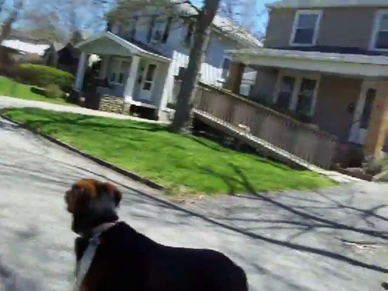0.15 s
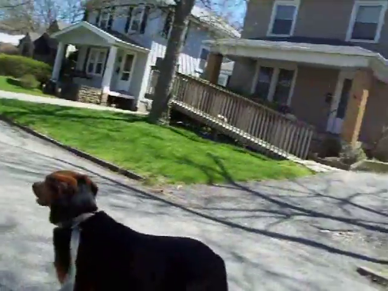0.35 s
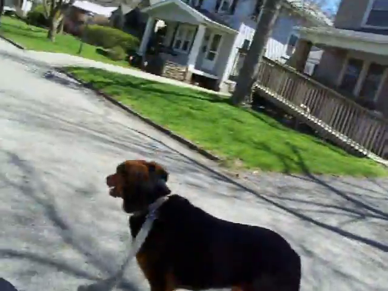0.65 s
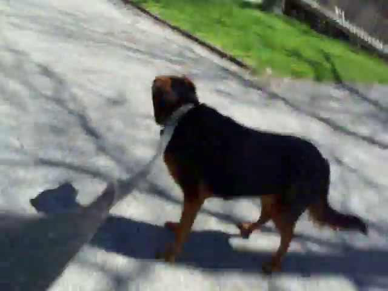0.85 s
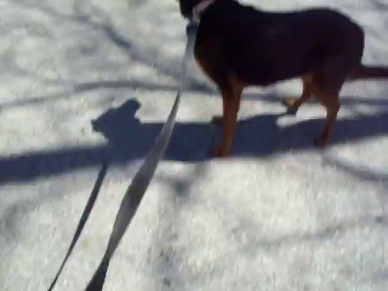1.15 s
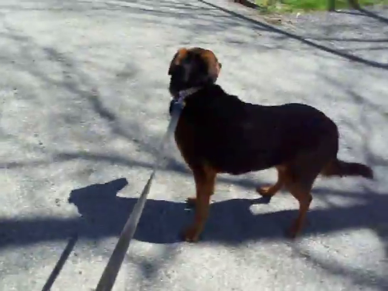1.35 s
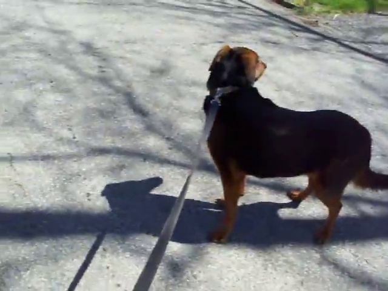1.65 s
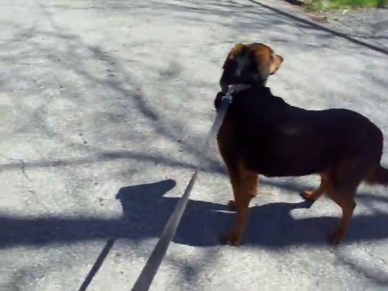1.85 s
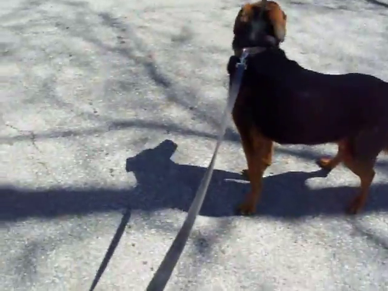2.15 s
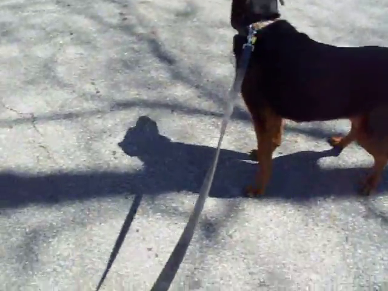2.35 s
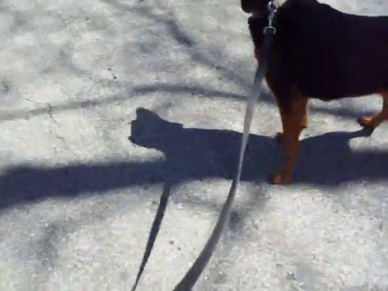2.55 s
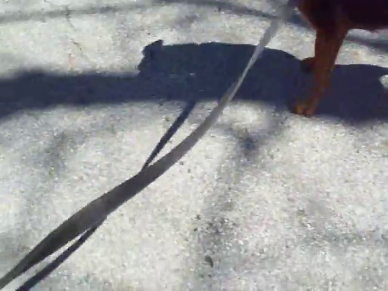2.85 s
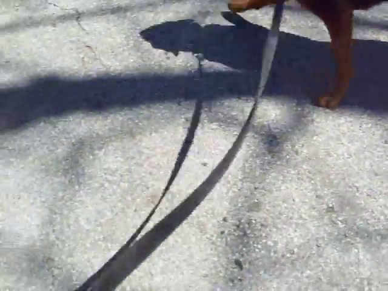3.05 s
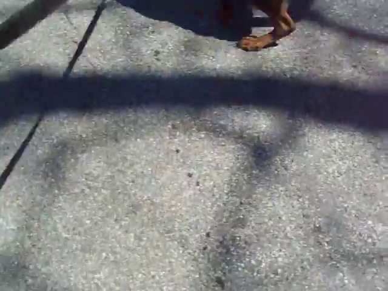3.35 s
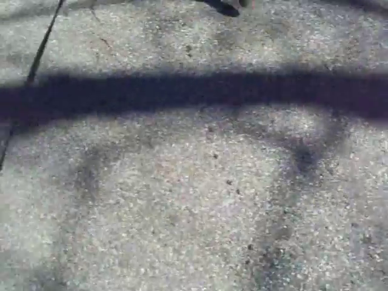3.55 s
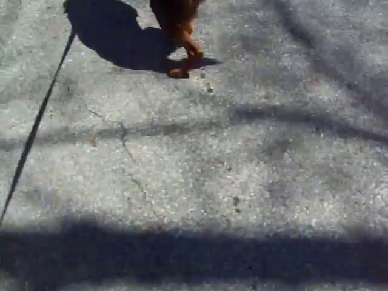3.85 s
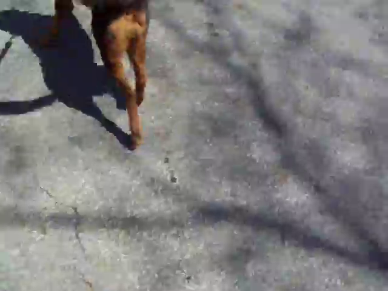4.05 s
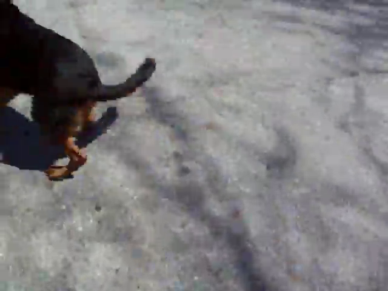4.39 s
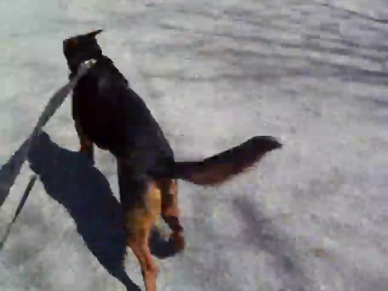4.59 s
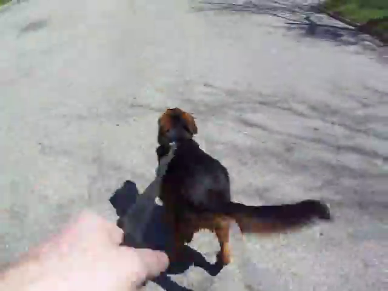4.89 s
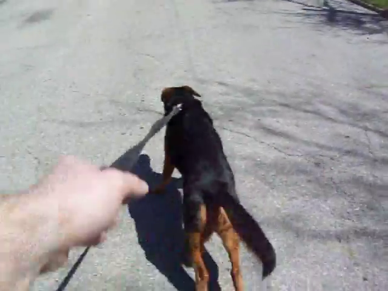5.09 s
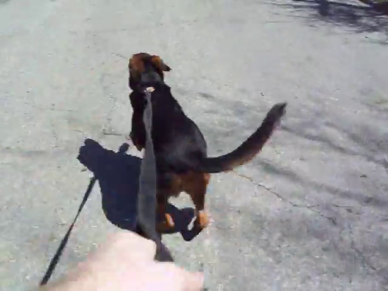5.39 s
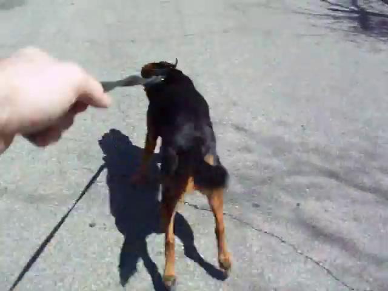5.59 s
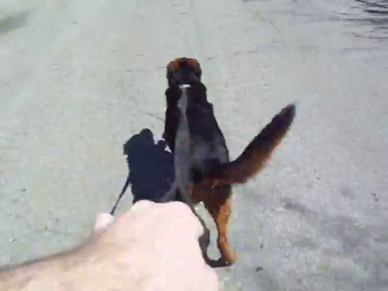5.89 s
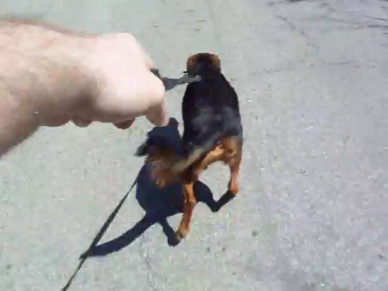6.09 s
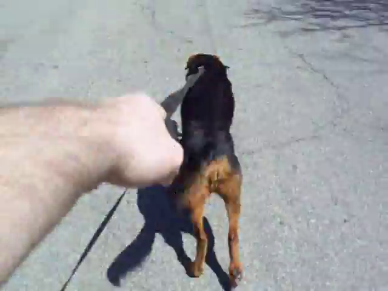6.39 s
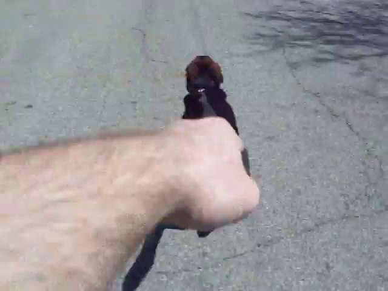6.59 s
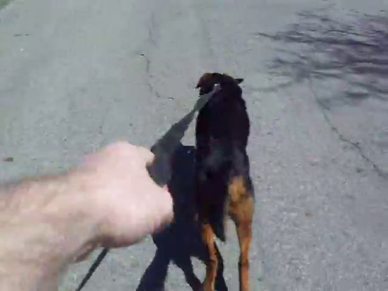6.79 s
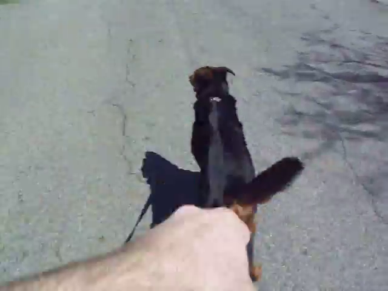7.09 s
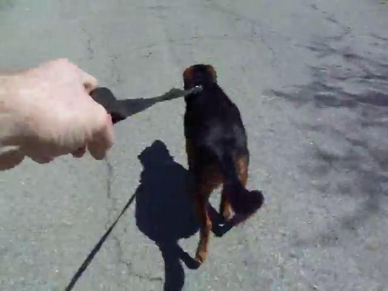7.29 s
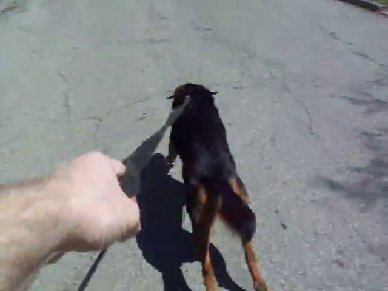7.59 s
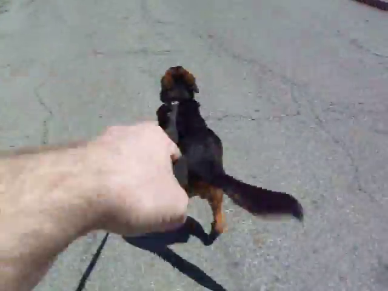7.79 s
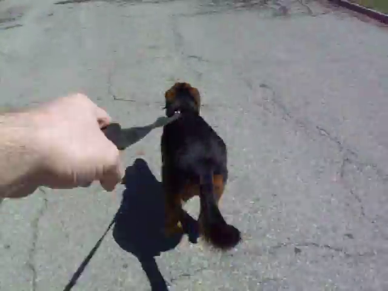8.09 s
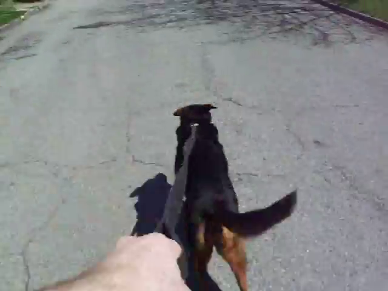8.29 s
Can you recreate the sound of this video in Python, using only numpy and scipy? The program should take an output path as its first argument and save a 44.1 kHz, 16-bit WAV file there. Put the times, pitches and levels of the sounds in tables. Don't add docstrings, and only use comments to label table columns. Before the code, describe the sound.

Quiet outdoor hum and repeated bird whistles, two hard wooden clacks, then skateboard wheels build from faint rattle to rough, buffeted roar.

```python
import sys
import numpy as np
from scipy import signal
from scipy.fft import rfft, irfft
from scipy.io import wavfile
from scipy.ndimage import uniform_filter1d

SR = 44100
rng = np.random.default_rng(int(sys.argv[2]) if len(sys.argv) > 2 else 0)


def digitize_waveform(pressure):
    field = np.atleast_2d(pressure).T
    bounded = np.clip(field, -1, 1)
    quanta = np.round(bounded * 32767).astype(np.int16)
    wavfile.write(sys.argv[1], SR, quanta)


def to_linear_factor(level_db):
    exponent = np.asarray(level_db, float) / 20
    return 10 ** exponent


N = 372204
T = np.arange(N) / SR

# t/s, blow/dB, contact/s, crack/dB, shudder/dB, shudder t60/s
SLAPS = [
    (3.0054, 3, .0003, -4, -13, .16),
    (3.1655, -3, .0015, -40, -16, .1),
]
# t/s, peak/dB, centre f/Hz, truck knock/dB
GRIT_TICKS = [(3.4693, -42.5, 2400, -36.5), (3.5982, -44.5, 2960, -65), (3.6369, -47, 2620, -43),
              (3.6691, -45, 2600, -45), (3.7217, -36.5, 2550, -35), (3.746, -51, 2930, -30),
              (3.7723, -37, 2640, -32.5), (3.8812, -38, 2710, -31.5), (3.9737, -48, 2700, -32),
              (4.002, -54, 2600, -35), (4.0257, -52.5, 2850, -43), (4.0712, -41, 2650, -37),
              (4.2251, -36, 2610, -26), (4.2586, -46, 2670, -38), (4.349, -46, 2660, -27),
              (4.372, -49, 2660, -45), (4.3977, -51, 2640, -47), (4.5266, -43.5, 2870, -31),
              (4.5681, -38.5, 3940, -42), (4.8122, -44.5, 2980, -42), (4.8668, -37.5, 2930, -55),
              (5.1375, -35.5, 6530, -51), (5.2056, -55.5, 3400, -29), (5.2452, -35, 7460, -34),
              (5.271, -36.5, 2770, -30.5), (5.3188, -33.5, 4220, -36.5), (5.5293, -40, 2620, -35),
              (5.583, -30, 4660, -43.5), (5.6843, -36.5, 3090, -35.5), (5.7211, -37, 2990, -28.5),
              (5.7754, -28.5, 3270, -34), (5.8365, -37, 2650, -28.5), (5.9963, -34, 2670, -33),
              (6.1113, -38, 2970, -23), (6.1634, -30, 2950, -29.5), (6.2395, -42, 2910, -18),
              (6.2973, -33, 2730, -22), (6.4021, -31, 2610, -31.5), (6.6036, -36, 2710, -29),
              (6.7854, -35, 3240, -29.5), (6.8262, -34.5, 2590, -30.5), (6.8541, -30, 2444, -20),
              (6.9057, -38, 2950, -30.5), (6.9966, -32.5, 2850, -15), (7.0583, -36.5, 2980, -22),
              (7.1136, -33.5, 2720, -28), (7.1567, -38, 2590, -28.5), (7.1828, -34.5, 2760, -40),
              (7.275, -42, 4510, -36.5), (7.306, -31, 2770, -22), (7.3753, -34.5, 2750, -25.5),
              (7.4214, -29, 2570, -18.5), (7.6154, -32, 2840, -30.5), (7.6425, -39.5, 2750, -25),
              (7.7075, -31, 2640, -29), (7.844, -36, 2860, -30.5), (7.869, -37.5, 2620, -32),
              (7.9851, -34, 2620, -31.5), (8.1379, -43, 2970, -19), (8.1699, -36, 2550, -30),
              (8.2268, -29, 2620, -22), (8.3786, -29.5, 2550, -30)]


def columns(table):
    s, *values = np.transpose(table)
    return [np.interp(T, s, v, left=-120, right=-120) for v in values]


def white():
    return rng.standard_normal(N)


def unit(x):
    return x / np.sqrt(np.mean(x ** 2))


def colour(x, points):
    hz, db = np.transpose(points)
    f = np.maximum(np.fft.rfftfreq(N, 1 / SR), 1)
    gain = to_linear_factor(np.interp(np.log(f), np.log(hz), db))
    return unit(irfft(rfft(x) * gain, N))


def ring(x, hz, width):
    return signal.lfilter(*signal.iirpeak(hz, hz / width, SR), x)


def body(x, modes):
    out = 0
    for k, (hz, width, db) in enumerate(modes):
        out = out + (-1) ** k * to_linear_factor(db) * ring(x, hz, width)
    return unit(out)


def dull(x, hz):
    return signal.sosfilt(signal.butter(3, hz, fs=SR, output="sos"), x)


def walk(rate):
    hold = int(SR / rate)
    steps = np.repeat(rng.standard_normal(N // hold + 1), hold)
    return 1.2 * uniform_filter1d(steps, hold)[:N]


def stones(rate, spread_db):
    chance = rng.random((3, N))
    hit = chance[0] < rate / SR
    sign = np.sign(chance[1] - .5)
    return hit * sign * to_linear_factor(-spread_db * np.log(chance[2] + .01))


def add(out, s, piece):
    i = int(round(s * SR))
    piece = piece[max(-i, 0):N - i]
    out[max(i, 0):max(i, 0) + len(piece)] += piece


def struck(modes, length):
    t = T[:int(length * SR)]
    return sum(to_linear_factor(db - 60 * t / t60) * np.sin(2 * np.pi * hz * t) for hz, db, t60 in modes)


def clicks(table, sharpness):
    out, t = np.zeros(N), T[:SR // 20]
    for s, db, hz, t60 in table:
        fade = to_linear_factor(-60 * t / max(t60, .003)) * (1 - np.exp(-t / .0005))
        snap = rng.standard_normal(len(t)) * fade
        snap = ring(ring(snap, hz, hz / sharpness), 1.1 * hz, 1.6 * hz)
        add(out, s, snap / np.abs(snap).max() * to_linear_factor(db))
    return out


def bumps(table):
    out = np.zeros(N)
    for s, db, width in table:
        u = T[:SR // 20] / width - 2
        dip = np.exp(-u ** 2 * 2)
        swing_back = .5 * np.exp(-(u - 1.6) ** 2 / 4.1)
        add(out, s - 2 * width, to_linear_factor(db) * (swing_back - dip))
    return out


def street():
    # t/s, low air/dB, murmur/dB, motor/dB, motor overtone/dB
    levels = [(0.0, -44, -51.5, -65, -56), (0.18, -43, -53.5, -45, -58), (0.32, -43.5, -54.5, -46, -65),
              (0.58, -45, -48, -43.5, -57), (0.92, -47, -38, -37, -50), (1.05, -42, -45, -39.5, -54),
              (1.38, -46, -42, -39.5, -50), (1.71, -42.5, -46, -37.5, -46.5),
              (1.86, -50.5, -43.5, -38, -49.5), (2.12, -50.5, -43.5, -36.5, -46.5),
              (2.5, -44, -42, -40.5, -42), (2.84, -44.5, -42.5, -43.5, -45), (2.97, -54, -39, -47, -48),
              (3.07, -63, -43.5, -79.5, -55.5), (3.2, -56, -60, -74, -80), (3.34, -67, -75, -79, -80),
              (3.5, -66, -73, -78.5, -88.5)]
    # f/Hz, level/dB
    murmur = [(88, -20.5), (150, -1), (398, -8), (835, -8), (1640, -14.5), (3430, -20), (4570, -40.5),
              (7070, -35), (8370, -49), (10900, -76), (18400, -120)]
    # f/Hz, width/Hz
    motor = [(86, 8), (129, 7.3)]
    # f/Hz, width/Hz, level/dB
    whine = (4290, 25, -68)
    air_db, murmur_db, *motor_db = columns(levels)
    out = unit(ring(white(), 45, 38)) * to_linear_factor(air_db + 2.5 + .5 * walk(7.4))
    for (hz, width), db in zip(motor, motor_db):
        hum = ring(ring(white(), hz, width), hz, 3 * width)
        out += unit(hum) * to_linear_factor(db + 3)
    out += colour(white(), murmur) * to_linear_factor(murmur_db + 1.5 + 2.2 * walk(21))
    whine_hz, whine_width, whine_db = whine
    fade_in = np.clip(T / .73, 0, 1) ** 2
    until_slap = T < SLAPS[0][0]
    return out + unit(ring(white(), whine_hz, whine_width)) * to_linear_factor(whine_db) * until_slap * fade_in


def sung(curve):
    s, hz, db = np.transpose(curve)
    t = np.arange(s[0], s[-1], 1 / SR)
    hoarse = uniform_filter1d(rng.standard_normal((2, SR // 4)), size=150)[:, :len(t)] * 12
    pitch = np.interp(t, s, hz) * (1 + .03 * hoarse[1])
    return to_linear_factor(np.interp(t, s, db) + 3 * hoarse[0]) * np.sin(2 * np.pi * np.cumsum(pitch) / SR)


def birds():
    # t/s, f/Hz, level/dB
    whistle = [(-.09, 1720, -32), (-.075, 1750, -15), (-.048, 1900, -9), (-.034, 2250, -11),
               (-.026, 2900, -11), (-.018, 3250, -4), (-.004, 3700, -2), (.004, 3950, -20)]
    # t/s, level/dB
    whistle_ends = [(-.005, -36), (.19, -34), (.385, -33), (.577, -32), (.768, -29), (.958, -30),
                    (1.145, -33), (1.332, -32), (1.516, -32), (1.702, -32), (1.888, -32), (2.072, -35)]
    # t/s, f/Hz, level/dB
    chirps = [
        [(.475, 4430, -71), (.49, 5160, -51), (.497, 5500, -68)],
        [(.492, 4100, -68), (.503, 5200, -53), (.51, 4670, -47), (.54, 4040, -49), (.58, 3500, -60.5),
         (.62, 2940, -48), (.64, 2700, -66)],
        [(.485, 1734, -66), (.51, 1485, -47), (.55, 1750, -56), (.57, 1900, -59)],
    ]
    # delay/s, level/dB
    houses = [(.034, -6), (.013, -8), (.022, -12), (.08, -16), (.125, -22)]
    calls = np.zeros(N + SR)
    for s, db in whistle_ends:
        add(calls, 1 + s + whistle[0][0], sung(whistle) * to_linear_factor(db))
    for chirp in chirps:
        add(calls, 1 + chirp[0][0], sung(chirp))
    t = T[:SR // 3]
    echo = rng.standard_normal(len(t)) * to_linear_factor(-36 - 60 * t / .3)
    echo[0] = 1
    for delay, db in houses:
        add(echo, delay, rng.standard_normal(300) * to_linear_factor(db - 24))
    return signal.fftconvolve(calls, echo)[SR:SR + N]


def wind():
    # t/s, level/dB
    rumble = [(3.44, -66.5), (3.7, -66), (3.82, -56), (4.34, -58.5), (4.55, -37.5), (4.61, -52),
              (4.83, -40), (5.26, -33.5), (5.35, -25), (5.4, -31), (5.85, -24.5), (6.1, -30.5), (6.27, -16),
              (6.31, -23.5), (6.68, -19), (6.89, -25.5), (7.1, -21), (7.16, -26.5), (7.66, -26),
              (7.71, -21.5), (7.94, -24.5), (8.24, -17.5), (8.44, -23.5)]
    # t/s, peak/dB, width of the push/s
    gusts = [(6.27, -21, 0.002), (6.497, -11, 0.002), (6.643, -10.5, 0.0011), (6.701, -17, 0.0018),
             (7.057, -4.5, 0.002), (7.098, -7.5, 0.0022), (7.354, -19, 0.002), (7.454, -8, 0.0012),
             (7.718, -10, 0.0022), (8.288, -9, 0.0014)]
    buffeting = body(white(), [(40.4, 52.6, 0), (91.8, 56.3, .97)])
    return buffeting * to_linear_factor(columns(rumble)[0] + 2 * walk(12)) + bumps(gusts)


def hands():
    # t/s, level/dB
    cloth = [(0.0, -65), (0.18, -66), (0.2, -57), (0.45, -72), (0.5, -61), (0.59, -61), (0.71, -68.5),
             (0.73, -32), (0.75, -56), (0.78, -45.5), (0.8, -55.5), (0.95, -42), (0.96, -25), (0.97, -37),
             (1.05, -55), (1.23, -59.5), (1.34, -50), (1.49, -62), (2.15, -62.5), (2.54, -52.5),
             (2.55, -59), (2.62, -42), (2.65, -49.5), (2.69, -41.5), (2.7, -50), (2.79, -65.5), (2.81, -43),
             (2.83, -57), (3.0, -51.5)]
    # f/Hz, level/dB
    rustle = [(350, -36), (600, -13), (2090, -2), (2350, 2.5), (2750, -7), (3580, 2), (7090, -3.5),
              (8370, -19), (10900, -58.5), (18400, -120)]
    # t/s, peak/dB, centre f/Hz, t60/s
    shell_knocks = [(.7268, -11, 1300, .02), (.7275, -16, 4000, .012), (.7435, -21, 3000, .012),
                    (.767, -21, 1500, .03), (.7795, -21, 1300, .03), (.9588, -8, 2600, .012),
                    (.9875, -14, 1900, .012),
                    (0.8356, -26.5, 2730, 0.0092), (1.25, -29, 1810, 0.03), (1.589, -37, 3560, 0.015),
               (1.6581, -31, 2080, 0.011), (2.423, -32.5, 1880, 0.019), (2.4568, -25, 1530, 0.018),
               (2.6002, -23, 1380, 0.019), (2.6823, -20, 3630, 0.0071), (2.7444, -29, 1370, 0.017),
               (2.8085, -25, 1334, 0.019), (2.9605, -20, 1430, 0.011), (3.1076, -30.5, 1640, 0.012)]
    # t/s, peak/dB, width of the push/s
    shell_bumps = [(0.7276, -15, 0.00048), (0.735, -21, 0.0014), (0.778, -15.5, 0.0016),
                   (0.9263, -4.5, 0.00058), (0.933, -22, .004)]
    crinkle = white() + .5 * unit(stones(1500, 3))
    cloth_db = np.minimum(columns(cloth)[0], -46.5)
    out = colour(crinkle, rustle) * to_linear_factor(cloth_db + 6 + 2 * walk(30))
    return out + clicks(shell_knocks, 1.4) + bumps(shell_bumps)


def tags():
    # t/s, level/dB
    touches = [(2.827, -48), (2.99, -55), (3.29, -64.5), (3.388, -60), (3.518, -59), (4.105, -55.5),
               (4.634, -62)]
    # f/Hz, level/dB, t60/s
    disc = [(7040, 0, .2), (7970, -3, .2)]
    out = np.zeros(N)
    for s, db in touches:
        add(out, s, struck(disc, .12) * to_linear_factor(db))
    return out


def shoe():
    # t/s, level/dB
    drags = [
        [(3.01, -38), (3.03, -32), (3.052, -28), (3.085, -39.5), (3.1, -43), (3.125, -35.5), (3.148, -44),
         (3.16, -55.5)],
        [(3.168, -30), (3.17, -39), (3.23, -73)],
        [(3.44, -77), (3.476, -43), (3.486, -50.5), (3.774, -34.5), (3.928, -46), (4.084, -40), (4.102, -52.5),
         (4.244, -30), (4.31, -66), (4.32, -44), (4.57, -44.5), (4.62, -69)],
    ]
    # f/Hz, level/dB
    scuff = [(290, -32.5), (500, 3.5), (758, -1.5), (895, 4), (1260, 2.5), (1430, -10), (2580, -11.5),
             (6000, -43), (7800, -70), (13200, -120)]
    slips = unit(stones(900, 3)) * to_linear_factor(3 * walk(41))
    return colour(slips, scuff) * sum(to_linear_factor(columns(drag)[0]) for drag in drags)


def paws_and_grit():
    # t/s, peak/dB, centre f/Hz, t60/s
    claws = [(3.288, -55, 4500, .02), (3.315, -51, 4000, .03), (3.372, -56, 4500, .02),
             (3.403, -54, 3600, 0.029), (3.424, -66, 5500, .015), (5.133, -42, 6000, 0.11),
             (5.577, -41.5, 5470, 0.076), (5.77, -40, 5020, 0.12)]
    grit = [(s, db, hz, .03) for s, db, hz, _ in GRIT_TICKS]
    return clicks([*grit, *claws], 1.3)


def clacks():
    # f/Hz, level/dB, t60/s
    slap_modes = [(220, -9, 0.037), (308.5, -2, 0.059), (515, -1, 0.033), (653, -15, 0.087),
                  (805, -13.5, 0.054), (1205, -18.5, 0.046)]
    out, shudder, t = np.zeros(N), np.zeros(N), T[:SR // 4]
    for s, blow_db, contact, crack_db, shudder_db, t60 in SLAPS:
        noise = rng.standard_normal((2, len(t)))
        onset = 1 - np.exp(-t / contact)
        add(out, s, struck(slap_modes, .25) * to_linear_factor(blow_db) * onset)
        crack = np.diff(noise[0], prepend=0) * to_linear_factor(crack_db - 60 * t / .006)
        add(out, s + 1 / 1200, crack)
        add(shudder, s, noise[1] * to_linear_factor(shudder_db - 60 * t / t60) * onset)
    out += 5 * ring(ring(shudder, 410, 840), 600, 1400)
    out += .4 * ring(ring(shudder, 1900, 1200), 1900, 1800)
    out += .008 * shudder
    return signal.sosfilt(signal.butter(3, 130, "high", fs=SR, output="sos"), out)


def rolling():
    # t/s, deck/dB, truck rattle/dB, grit hiss/dB
    levels = [(3.44, -61.5, -71, -77), (3.52, -62, -71, -67), (3.68, -45, -45, -62.5),
              (3.84, -36.5, -44.5, -61.5), (4.19, -38, -55, -66), (4.23, -27, -42, -63),
              (4.4, -34.5, -49.5, -62.5), (4.57, -34.5, -50, -69), (4.61, -41.5, -61.5, -71),
              (4.85, -31.5, -50, -67), (5.17, -30.5, -52, -63.5), (5.22, -23.5, -34.5, -54.5),
              (5.35, -23.5, -42, -61), (5.58, -22.5, -43.5, -59.5), (5.76, -21, -42, -57),
              (6.17, -15.5, -32, -53), (6.36, -19, -36, -57.5), (6.39, -15, -33.5, -55.5),
              (6.57, -17, -34, -54.5), (7.24, -18.5, -34, -56), (7.6, -18, -32.5, -54),
              (7.71, -15, -31.5, -52), (7.83, -19, -35.5, -57.5), (8.26, -16, -32.5, -54),
              (8.3, -23.5, -36.5, -61.5), (8.44, -16, -34.5, -54)]
    # f/Hz, width/Hz, level/dB
    deck = [(179, 140, -2.5), (258.5, 88, 1.5), (338, 64, -1.5), (486, 120, -4.5), (565, 54.8, 1.5),
            (735, 150, -6), (807, 87, -5.5), (1007, 77, -14)]
    # f/Hz, width/Hz, level/dB
    trucks = [(935, 126, -0.5), (1324, 105, 0.5), (1575, 208, -3.5), (2050, 730, -13.5), (2700, 300, -21.5)]
    # f/Hz, level/dB
    hiss = [(1500, -20), (2800, 0), (4500, -2), (7100, -4), (8400, -14), (11000, -50)]
    # t/s, peak/dB
    cracks = [(5.837, -8), (6.059, -16), (6.265, -4), (6.5, 1.5), (6.558, -12), (6.995, -6), (7.376, 1.5),
              (7.42, -1), (7.58, -11), (7.68, -17), (7.717, -1), (7.765, -10), (7.811, -23), (8.079, -5.5),
              (8.333, -19), (8.388, -2.5)]
    deck_db, truck_db, hiss_db = columns(levels)
    rough_db = 1.6 * walk(60) + .8 * walk(14)
    road = unit(stones(1500, 1.79)) * to_linear_factor(rough_db)
    rattle = unit(stones(800, 4)) * to_linear_factor(1.5 * rough_db)
    out = dull(body(road, deck), 1400) * to_linear_factor(deck_db)
    out += dull(body(.7 * road + rattle, trucks), 3000) * to_linear_factor(truck_db + 1)

    blow = np.arange(N) == 0
    knock = body(blow, deck)[:SR // 10]
    clink = body(blow, trucks)[:SR // 10]
    for s, db in cracks:
        add(out, s, dull(knock, 1300) / np.abs(knock).max() * to_linear_factor(db - 5))
    for s, _, _, db in GRIT_TICKS:
        add(out, s, dull(clink, 3200) / np.abs(clink).max() * to_linear_factor(db + 5))

    grit = white() + .5 * rattle
    grit_db = hiss_db + 1 + .24 * rough_db + 1.4 * walk(40)
    return out + colour(grit, hiss) * to_linear_factor(grit_db)


def scene():
    background = street() + birds() + wind()
    near = hands() + tags() + shoe() + paws_and_grit()
    return (background + near + clacks() + rolling())[None]


def roll_off(x):
    return signal.sosfilt(signal.butter(12, 8520, fs=SR, output="sos"), x)


def record(dry):
    top_hz, ceiling = 8150, .7
    hiss = white() * to_linear_factor(-69)
    top_cut = signal.cheby1(10, .5, top_hz, fs=SR, output="sos")
    soft = signal.sosfilt(top_cut, dry + hiss)
    return roll_off(np.clip(soft, -ceiling, ceiling))


dry = scene()
out = record(dry)
digitize_waveform(out)
```